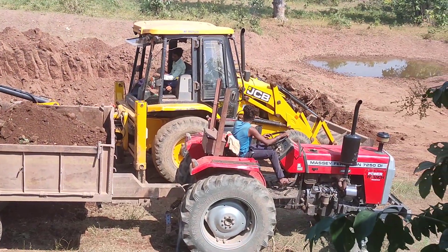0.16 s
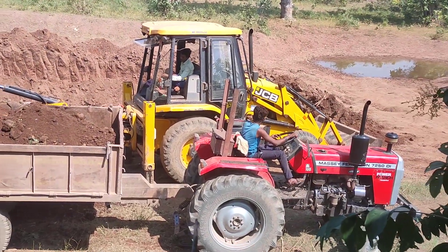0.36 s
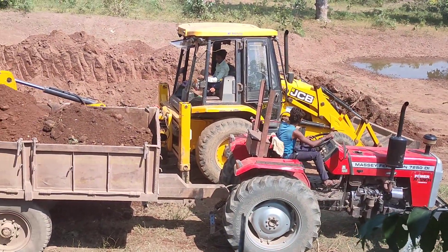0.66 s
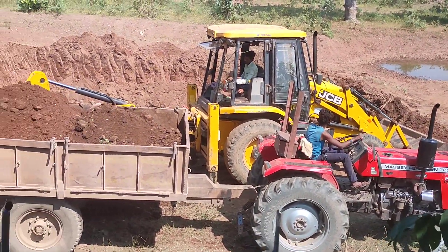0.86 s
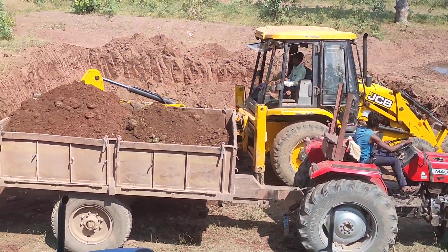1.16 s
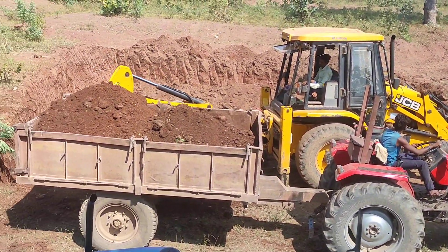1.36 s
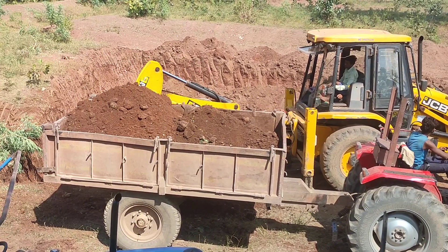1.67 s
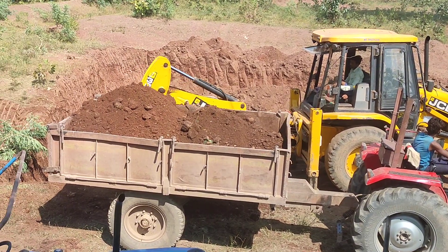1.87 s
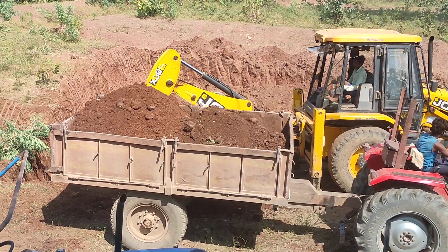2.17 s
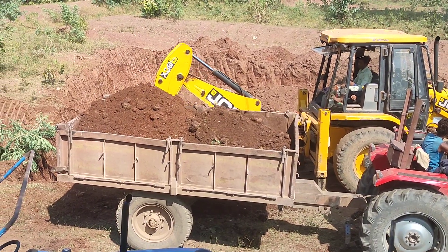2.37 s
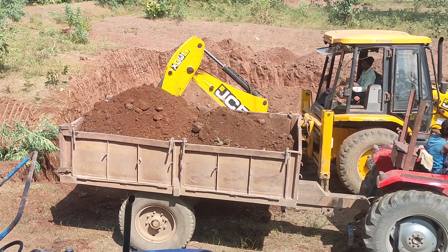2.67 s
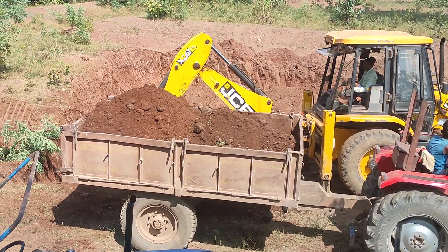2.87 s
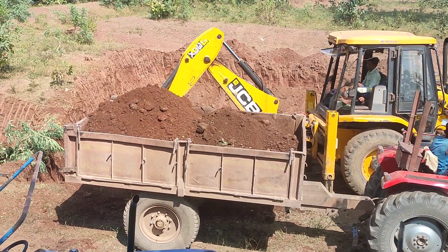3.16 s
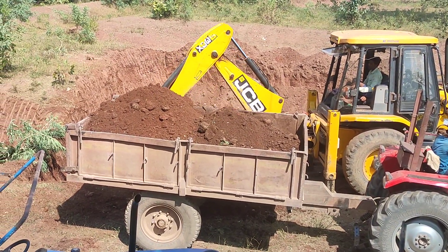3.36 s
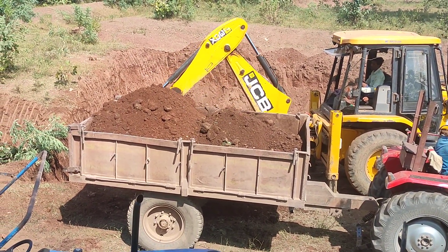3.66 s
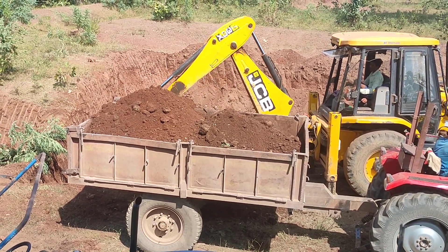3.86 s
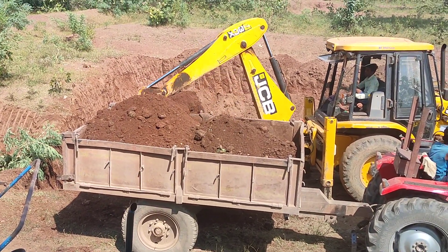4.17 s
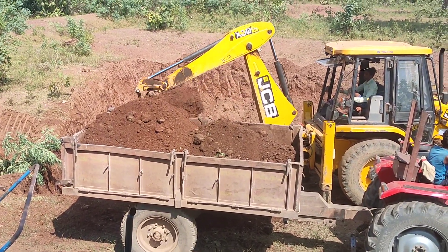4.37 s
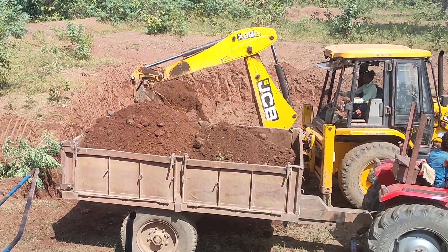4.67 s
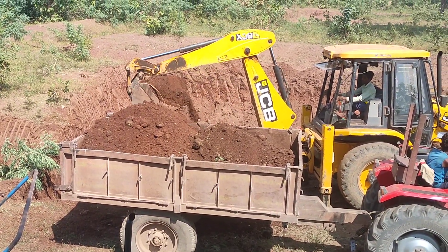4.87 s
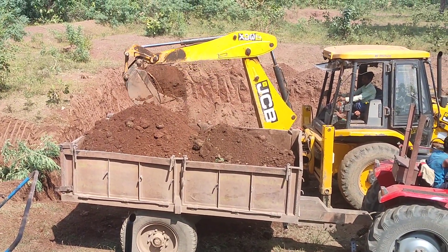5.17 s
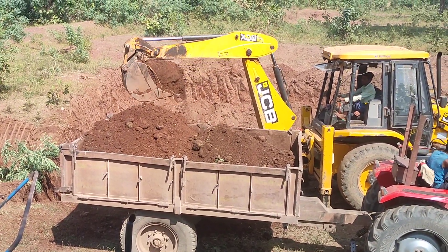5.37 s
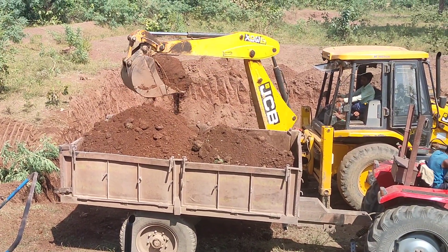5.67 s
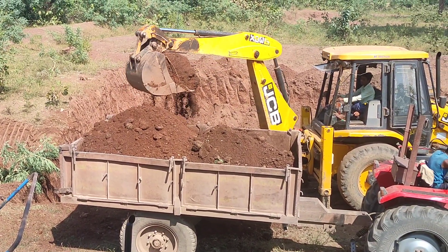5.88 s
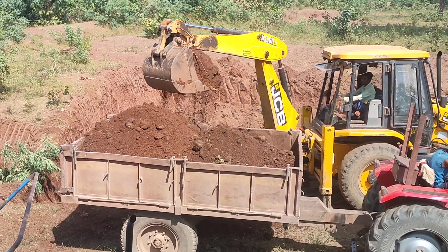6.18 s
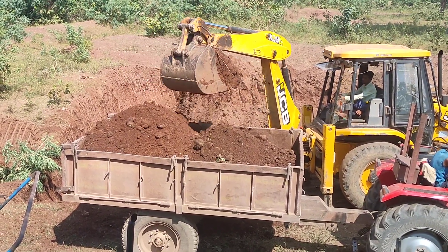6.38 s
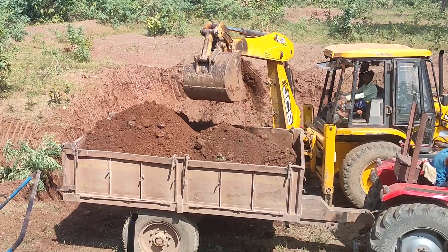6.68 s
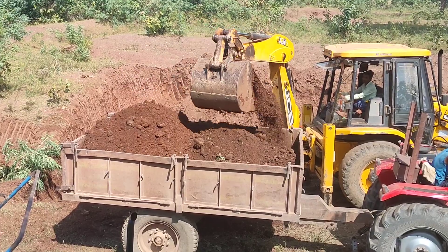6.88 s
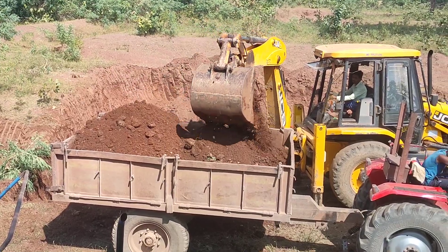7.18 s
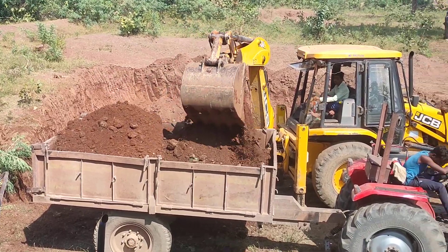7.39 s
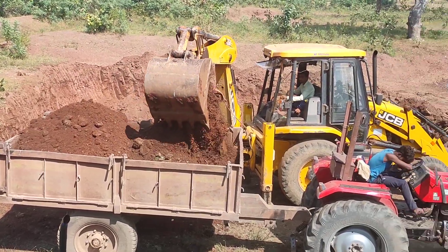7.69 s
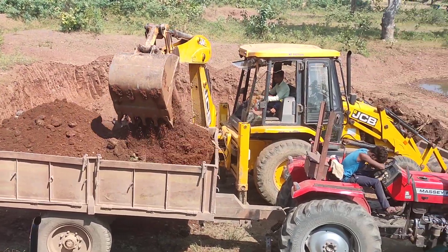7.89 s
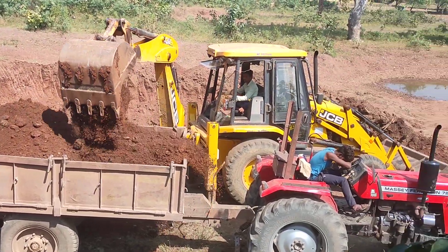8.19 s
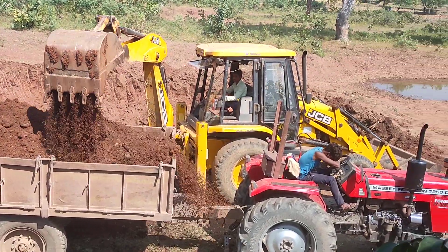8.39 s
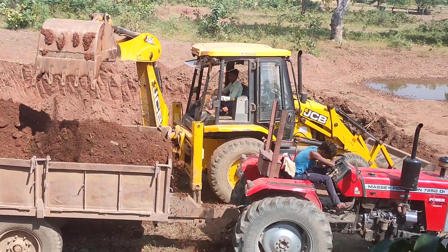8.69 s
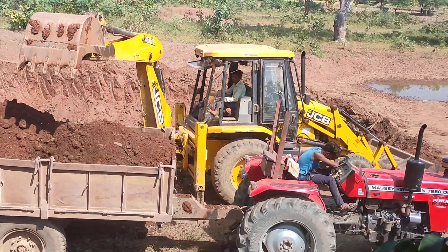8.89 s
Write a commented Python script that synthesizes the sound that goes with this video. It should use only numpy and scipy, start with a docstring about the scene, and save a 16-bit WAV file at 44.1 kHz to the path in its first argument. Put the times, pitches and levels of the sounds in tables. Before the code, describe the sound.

In an open field, a digger's four-cylinder diesel runs fast and uneven a few metres away, over a roaring fan and an idling tractor. A steel bucket scrapes soil in the first second. Later a hydraulic pump whines, soil sizzles from the bucket, and hard linkage clanks strike at about eight seconds, followed by gritty ticks. Close phone pickup, thin in the bass, with wide treble.

```python
"""An open field: a four-cylinder diesel digger works a few metres from a phone, a tractor idling beside it.
Each firing excites resonances: exhaust thud, pipe ring, block knock, valve clatter and injector spit.
Flickering noise bands make the fan roar, the tractor's idle included, with rush and hiss above.
Noise grains sing in the scraping bucket, blows ring its linkage, and a sine at tooth rate is the gear hum.
A narrow resonance whines as the pump; filtered bursts tick as dry grit over a sizzle of pouring soil."""
import sys
import numpy as np
from scipy import signal
from scipy.fft import rfft, irfft
from scipy.io import wavfile
from scipy.ndimage import uniform_filter1d

SR = 44100
rng = np.random.default_rng(int(sys.argv[2]) if len(sys.argv) > 2 else 0)


def transcribe(signal):
    """Save signal, clipped to [-1, 1], as a 16-bit WAV file at the path in sys.argv[1]."""
    frames = np.atleast_2d(signal).T
    limited = np.clip(frames, -1, 1)
    pcm = np.round(limited * 32767).astype(np.int16)
    wavfile.write(sys.argv[1], SR, pcm)


N = 399105
T = np.arange(N) / SR  # time [s]
HZ = np.arange(N // 2 + 1) * SR / N + 1e-3  # spectrum frequencies [Hz], kept above zero


def undb(db):
    """Decibels to amplitude."""
    return 10 ** (np.asarray(db) / 20)


def unit(x):
    """Scale to an RMS of 1."""
    return x / np.sqrt(np.mean(x ** 2))


def noise():
    """Two unrelated noises: the direct sound and what scatters round the phone."""
    return rng.standard_normal((2, N))


def curve(table):
    """Straight lines in time through (time, value) rows."""
    s, values = np.transpose(table)
    return np.interp(T, s, values)


def over_hz(table):
    """Straight lines in log frequency through (frequency, value) rows."""
    hz, values = np.transpose(table)
    return np.interp(np.log(HZ), np.log(hz), values)


def ring(x, modes, sign=-1):
    """Sum of resonances (Hz, width Hz, dB); sign 1 starts them in step, -1 alternately."""
    gain = 0
    for k, (hz, width_hz, db) in enumerate(modes):
        gain = gain + sign ** k * undb(db) / (1 + 1j * (HZ - hz * hz / HZ) / width_hz)
    return irfft(rfft(x) * gain, N)


def soften(x, top_hz):
    """A push that lasts a moment excites little above top_hz: a low-pass."""
    return signal.sosfilt(signal.butter(4, top_hz, fs=SR, output="sos"), x)


def walk(rate):
    """Random levels held 1 / rate s and slewed twice; spread near 1."""
    hold = int(SR / rate)
    steps = np.repeat(rng.standard_normal(N // hold + 1), hold)
    return 1.294 * uniform_filter1d(uniform_filter1d(steps, hold), hold)[:N]


def swell(s, length, db, rise, fall):
    """Rises, holds until s + length, then dies away by 20 dB in fall seconds."""
    fall_db = 20 * np.clip(T - s - length, 0, None) / fall
    return undb(db - fall_db) * np.clip((T - s) / rise, 0, 1)


def decay(s, db, rise, tau):
    """Rises in a straight line from s, then dies away exponentially."""
    fading = np.exp(-np.clip(T - s - rise, 0, None) / tau)
    return undb(db) * fading * np.clip((T - s) / rise, 0, 1)


def bands(spectrum, gate, flicker_db):
    """Half-octave noise bands that each flicker on their own."""
    out, colour, octave = 0, undb(over_hz(spectrum)), np.log2(HZ / 30)
    for centre in np.arange(0, 9.6, .5):
        share = np.cos(np.pi * np.clip(octave - centre, -.5, .5))
        band = irfft(rfft(gate * noise()) * colour * share, N)
        out = out + undb(flicker_db * walk(9)) * band
    return unit(out)


# engine speed: (time [s], crank speed [rpm])
CRANK_SPEED = [(0, 1510.6), (1.15, 1457.4), (2, 1510), (4.2, 1507.6), (4.8, 1524), (6.1, 1504.6),
               (6.7, 1560.2), (7.9, 1522.6), (9.05, 1556.6)]
# load on the engine while the arm lifts and swings: (time [s], load [0-1])
ENGINE_LOAD = [(0, 0.55), (.6, 0.66), (.8, 1), (4.3, 0.82), (4.6, 0.7), (6.2, 0.85), (6.5, 0.22),
               (7.4, 0.36), (7.9, 0.66), (8.4, 0.36), (9.05, 0.44)]
# firings that burn harder than their neighbours: (time [s], extra level [dB])
HARD_FIRINGS = [(.774, 4), (.937, 2), (1.020, 2), (1.267, 3), (1.595, 2), (1.99, 2), (2.070, 2), (2.149, 4),
                (2.230, 2), (2.469, 3), (2.945, 3), (3.024, 3), (3.263, 3), (3.581, 3), (3.819, 2),
                (3.979, 2), (4.06, 3), (4.14, 2), (4.221, 4), (5.325, 2), (5.562, 2), (6.203, 3),
                (6.669, 2), (6.744, 3), (7.29, 2), (8.31, 3), (8.542, 2)]
START_CYCLE = -.186  # place in the two-turn cycle at the start [cycles]
EARLY_STROKES = .02  # advance of a fiercer burn [strokes per unit of burn]
FOURTH_UNLOADED_DB = -8  # the fourth cylinder fades towards this as the load comes off


def firings(lag, cylinder_db, scatter_db, burn, chosen=HARD_FIRINGS):
    """Seconds since the last firing (lag in cycles) and its size; burn is the chance all parts share."""
    rpm = curve(CRANK_SPEED)
    strokes = 4 * (START_CYCLE + np.cumsum(rpm) / 120 / SR - lag + 2)  # + 2 keeps the count positive
    strokes = strokes + EARLY_STROKES * np.interp(strokes, np.arange(len(burn)), burn)
    count = strokes.astype(int)
    stroke_db = scatter_db * (burn + rng.standard_normal(len(burn))) / np.sqrt(2)
    s, extra_db = np.transpose(chosen)
    stroke_db[np.round(np.interp(s, T, strokes)).astype(int)] = extra_db  # in place of the scatter
    unloaded = np.clip(1 - 2 * curve(ENGINE_LOAD), 0, 1)
    db = np.take(cylinder_db, count % 4) + (count % 4 == 3) * FOURTH_UNLOADED_DB * unloaded
    return (strokes - count) * 30 / rpm, undb(db + stroke_db[count])


def puffs(firing, decay_s, steady):
    """Gas flow that jumps at each firing and dies away onto a steady level."""
    since, size = firing
    return steady + size * np.exp(-since / decay_s)


def blows(firing, tail, steady):
    """One sharp pressure step per firing with a ragged tail; the scattered copy trails by 9 samples."""
    since, size = firing
    step = size * (np.diff(since, prepend=0) < -1 / SR / 2)
    rattle = (steady + tail * size * np.exp(-since / .008)) * noise()
    return np.array([step, np.roll(step, 9)]) + rattle


# soil pouring from the bucket: (time [s], length [s], level before its filter [dB])
SOIL_POURS = [(6.3, 1, -65), (8.0, 0.95, -56)]
# ticks of dry grit: (time [s], peak before the filters [dB], decay [s], lowest frequency [Hz])
GRIT_TICKS = [(3.735, -37, 0.098, 12500), (6.802, -35, .01, 13000), (6.938, -31.5, 0.0097, 6100),
              (8.33, -34, 0.01, 8000), (8.391, -35, 0.017, 5500), (8.745, -34.5, 0.017, 6040),
              (8.785, -32, 0.02, 5400), (8.829, -28, 0.02, 5070)]
POUR_RISE_S, POUR_FALL_S, GRIT_RISE_S = 0.061, 0.23, 0.014


def grit():
    """Short fizzes of tiny clicks above their lowest frequency, over a sizzle of pouring soil."""
    flow = sum(swell(*row, POUR_RISE_S, POUR_FALL_S) for row in SOIL_POURS)
    out = flow * undb(2.1 * walk(110)) * ring(noise(), [(10800, 44000, 1.8)])
    for s, db, tau, low_hz in GRIT_TICKS:
        clicks = decay(s - GRIT_RISE_S / 2, db, GRIT_RISE_S, tau) * undb(1.7 * walk(300)) * noise()
        clicks = ring(clicks, [(6340, 2900, -3.5), (15100, 2400, -3), (11000, 7300, -18)], 0.62)
        out = out + signal.sosfilt(signal.butter(4, low_hz, "high", fs=SR, output="sos"), clicks)
    return out


# hydraulic pump strokes: (time [s], length [s], level [dB])
PUMP_STROKES = [(6.152, 0.84, -53.5), (7.002, 0.76, -49), (8.306, 0.22, -54)]
PUMP_HZ, PUMP_WIDTH_HZ = 1496, 26
PUMP_RISE_S, PUMP_FALL_S = 0.16, 0.19


def pump():
    """A wavering whine: oil flow in one narrow resonance."""
    flow = sum(swell(*row, PUMP_RISE_S, PUMP_FALL_S) for row in PUMP_STROKES)
    return flow * unit(ring(noise(), [(PUMP_HZ, PUMP_WIDTH_HZ, 0)]))


# strength of the four cylinders in the block knock, which also jolts the gear: (level [dB]) each
KNOCK_CYLINDERS = [-9, 0, -14, -6]
GEAR_TEETH, RATED_RPM = 24, 1510
# before the jolts: level unloaded, gain at full load, gain as the speed sags
GEAR_DB, GEAR_LOAD_DB, GEAR_LABOUR_DB_PER_RPM = -48.5, 9, 0.12


def gear():
    """A gear on the crank hums once a tooth, louder under load, jolted by each firing, and wavers."""
    rpm = curve(CRANK_SPEED)
    turns = np.cumsum(rpm * (1 + .012 * walk(25))) / 60 / SR
    level_db = GEAR_DB + GEAR_LOAD_DB * curve(ENGINE_LOAD) + GEAR_LABOUR_DB_PER_RPM * (RATED_RPM - rpm)
    level_db = level_db + 3.0 * walk(40)
    jolts = puffs(firings(.19, KNOCK_CYLINDERS, 1.2, rng.standard_normal(N // 500)), .03, .3)
    hum = undb(level_db) * jolts * np.sin(2 * np.pi * GEAR_TEETH * turns)
    return hum * np.array([[np.sqrt(2)], [0]])  # direct sound only


# bucket dragging through soil: (time [s], length [s], steel singing level [dB], stony rasp level [dB])
SCRAPES = [(0.142, 0.04, -34, -52.5), (0.194, 0.39, -42.5, -52.5), (0.315, 0.052, -37, -51),
           (0.653, 0.39, -48, -49)]
# partials of the bucket steel: (frequency [Hz], relative level [dB])
BUCKET_PARTIALS = [(716, 5), (785, 9), (890, 5), (1590, -2), (1760, -10), (1900, 1), (1965, 0), (2150, -7),
                   (2360, -3), (2480, -4), (2580, 0), (2760, -2), (3260, -7), (3540, -10), (3850, -9),
                   (4020, -7), (4420, -9)]
SCRAPE_RISE_S, SCRAPE_FALL_S = 0.019, 0.15


def bucket():
    """Stones slip along the steel in dense uneven grains that rasp and keep its partials singing."""
    singing, rasping = (sum(swell(s, length, dbs[k], SCRAPE_RISE_S, SCRAPE_FALL_S)
                            for s, length, *dbs in SCRAPES) for k in range(2))
    grains = undb(2.0 * walk(62.0)) * noise()
    rasp = ring(ring(grains, [(2720, 1100, -0.5), (7260, 760, -1)]), [(3500, 3100, 0)])
    partials = [(hz, 30, db / 2) for hz, db in BUCKET_PARTIALS]  # half the level, passed twice
    song = ring(ring(grains, partials), partials)
    return singing * unit(song) + rasping * unit(soften(rasp, 11000))


# linkage clanks, levels before the resonances:
# (time [s], peak [dB], rise [s], decay [s], boom over peak [dB], hardness over peak [dB])
LINKAGE_CLANKS = [(1.654, -41.5, 0.014, 0.032, 6.5, -36), (5.125, -45.5, 0.014, 0.04, 11, -57),
                  (8.037, -28.5, 0.008, 0.016, 8, -6), (8.06, -33.5, 0.0042, 0.025, -5, -5),
                  (8.147, -38.5, 0.0044, 0.033, 1, -34), (8.574, -43, 0.021, 0.022, 2, -24),
                  (8.827, -43, 0.0026, 0.013, 7, -30)]
# modes of the steel arm: (frequency [Hz], relative level [dB], 60 dB decay time [s])
ARM_MODES = [(479, -12, .06), (641, -12, .06), (991, -17, .06), (1249, -20, .07), (1384, -26, .07),
             (1879, -24, .055), (2064, -25, .04), (2288, -30, .07), (2482, -26, .045), (2762, -30, .035),
             (2912, -30, .08), (3472, -33, .05), (3720, -30, .045), (3924, -35, .06)]
STRIKE_DB = 28  # the clean blow at the top of each clank, over its rough part


def clanks():
    """A blow rings the steel arm, booms in the trailer body and cracks; hard ones add treble and a thump."""
    def rough(k):
        envelope = sum(decay(s, db + [0, boom_db, hard_db][k], rise, tau)
                       for s, db, rise, tau, boom_db, hard_db in LINKAGE_CLANKS)
        return envelope * undb(1.0 * walk(250)) * noise()

    hits, booms, snaps = rough(0), rough(1), rough(2)
    s, db, rise, _, boom_db, _ = np.transpose(LINKAGE_CLANKS)
    strikes = np.zeros((2, N))  # for the high and the low modes
    strikes[:, ((s + rise) * SR).astype(int)] = undb([db + STRIKE_DB, db + boom_db + STRIKE_DB])
    modes = [(hz, np.log(1000) / np.pi / t60, db) for hz, db, t60 in ARM_MODES]
    high, low = [m for m in modes if m[0] > 1450], [m for m in modes if m[0] <= 1450]
    crack = soften(ring(hits, [(2430, 2400, 10.0)]), 4100)
    treble = soften(ring(snaps, [(6700, 1200, 3.9)]), 9200)
    boom = ring(ring(booms, [(580, 800, 20.7)]), [(640, 650, 0)])
    thump = soften(ring(snaps, [(165, 100, 37.0)]), 180)
    arm = undb(41) * soften(ring(hits + strikes[0], high), 4500)
    arm = arm + undb(32.5) * ring(booms + strikes[1], low)
    return crack + treble + boom + thump + arm


# strength of the four cylinders in the clatter and the gas flow: (level [dB]) each
CLATTER_CYLINDERS = [-2, 0, -5, -4]
# fan, gears and the idling tractor: (frequency [Hz], relative level [dB])
ROAR_SPECTRUM = [(250, -13), (330, 1.5), (460, 2.5), (740, -4.5), (1000, -6), (1350, -12.5), (1700, -19),
                 (2400, -43)]


def fan_roar(burn):
    """Low noise bands that swell with each exhaust puff."""
    return bands(ROAR_SPECTRUM, puffs(firings(.21, CLATTER_CYLINDERS, .8, burn), .014, .85), 0.87)


# middle and top of the gas noise, each: (frequency [Hz], relative level [dB])
RUSH_SPECTRUM = [(500, -33), (1200, -44), (1600, -0.5), (3000, 1.5), (4200, -8.5), (4950, -21), (6000, -55)]
HISS_SPECTRUM = [(4000, -5), (4950, -9.5), (6900, -3.5), (8500, -11), (10700, -22.5), (13000, -23),
                 (15800, -9.5)]


def gas_noise(burn):
    """Rush and hiss bands, both pushed by the same gas puffs but dying away at different rates."""
    gas = firings(.21, CLATTER_CYLINDERS, 1.0, burn)
    rush = bands(RUSH_SPECTRUM, puffs(gas, 0.029, 2.0), 0.5)
    hiss = bands(HISS_SPECTRUM, puffs(gas, 0.092, 1.5), 1.0)
    return rush, hiss


# strength of the four cylinders at the injectors: (level [dB]) each
SPIT_CYLINDERS = [0, 0, -1, -3]
# injector resonances: (frequency [Hz], width [Hz], relative level [dB])
INJECTOR_MODES = [(11830, 60, 0), (12300, 50, -4), (14800, 100, -1), (14500, 3000, -8)]


def injector_spit(burn):
    """Each injection is a noise puff through high resonances."""
    return unit(ring(puffs(firings(.16, SPIT_CYLINDERS, 1.4, burn), .007, .2) * noise(), INJECTOR_MODES))


# resonances of the valve covers: (frequency [Hz], width [Hz], relative level [dB])
COVER_MODES = [(1488, 15, 8), (1994, 110, -1.5), (2235, 46, 8.5), (3550, 65, -20)]


def valve_clatter(burn):
    """Rough blows rattle the covers."""
    blow = blows(firings(0.17, CLATTER_CYLINDERS, 1.28, burn), 0.053, 0.094)
    return unit(soften(ring(blow, COVER_MODES), 3100))


# strength of the four cylinders in the tappet tick: (level [dB]) each
TICK_CYLINDERS = [-7, 0, -14, -12]
# tappet ticks that stand out: (time [s], extra level [dB])
LOUD_TICKS = [(.055, 3), (.132, 6), (.451, 0), (.531, 6), (.61, 0), (.772, 8), (.937, 3.5), (1.02, 7),
              (2.148, 11), (2.31, 14), (2.945, 7), (4.28, 14), (4.46, 6), (7.837, 8)]
# tappet resonances: (frequency [Hz], width [Hz], relative level [dB])
TAPPET_MODES = [(2900, 36, 0), (3070, 45, -1)]


def tappet_tick(burn):
    """Blows ring two close tappet resonances inside a broad one."""
    blow = blows(firings(.19, TICK_CYLINDERS, 1.6, burn, LOUD_TICKS), .03, .002)
    return unit(ring(ring(blow, TAPPET_MODES), [(3000, 500, 0)]))


# resonances of the engine block: (frequency [Hz], width [Hz], relative level [dB])
BLOCK_MODES = [(1063.3, 35, 11), (1240.6, 12.7, 6.2)]


def block_knock(burn):
    """Combustion blows ring the block inside a broad resonance."""
    blow = blows(firings(.185, KNOCK_CYLINDERS, .8, burn), .02, .003)
    return unit(ring(ring(blow, BLOCK_MODES, 1), [(1130, 650, 0)]))


# strength of the four cylinders in the pipe ring: (level [dB]) each
RING_CYLINDERS = [-4, 0, -1, -5]
# pipe resonances: (frequency [Hz], width [Hz], relative level [dB])
PIPE_MODES = [(549, 18, -2.5), (584, 20.3, 7), (813, 16.7, -0.5)]


def pipe_ring(burn):
    """Pressure steps ring the pipe inside a broad resonance."""
    blow = blows(firings(.175, RING_CYLINDERS, 1.0, burn), .022, .008)
    return unit(ring(ring(blow, PIPE_MODES, 1), [(680, 700, 0)]))


# strength of the four cylinders in the exhaust thud: (level [dB]) each
THUD_CYLINDERS = [-9, 0, -13, -2]
# exhaust resonances: (frequency [Hz], width [Hz], relative level [dB])
EXHAUST_MODES = [(277.7, 14, 5.5), (371.3, 34, 7), (393.4, 27, 10), (515.7, 37, 12.5), (764, 98, -7.5)]


def exhaust_thud(burn):
    """Pressure steps ring the low exhaust resonances in step."""
    blow = blows(firings(.195, THUD_CYLINDERS, 1.0, burn), .03, .007)
    return unit(soften(ring(blow, EXHAUST_MODES, 1), 850))


# how far the phone is turned towards the engines: (time [s], facing [0-1])
PHONE_FACING = [(0, 0.48), (.3, 1), (1.0, 0.71), (1.5, 0.09), (2.5, 0.08), (7.3, 0.2), (8.1, 0.47),
                (9.05, 0.48)]
# thud, pipe ring, knock, roar, clatter, tick, treble:
# (reference level [dB], gain at full load [dB], gain when faced [dB])
ENGINE_PARTS = [(-37.5, -3, 4), (-41, 3.5, -3.5), (-51.5, 11, 1), (-38, 2.5, 4), (-48.5, 0.5, 7),
                (-58.5, 5, 12.5), (-59, -1.74, 2)]


def engine():
    """Each firing rings every part over air and gear roar; load and the phone's facing set the balance."""
    load, facing = curve(ENGINE_LOAD), curve(PHONE_FACING)
    thud, pipe, knock, roar, clatter, tick, treble = (
        undb(db + load * load_db + facing * faced_db) for db, load_db, faced_db in ENGINE_PARTS)
    burn = rng.standard_normal(N // 500)
    rush, hiss = gas_noise(burn)
    return (roar * fan_roar(burn)
            + clatter * (rush + 0.48 * valve_clatter(burn))
            + treble * (2.83 * hiss + .45 * injector_spit(burn))
            + tick * tappet_tick(burn)
            + knock * block_knock(burn)
            + pipe * pipe_ring(burn)
            + thud * exhaust_thud(burn))


# how alike the two ports hear, limited to 0.99 in use: (frequency [Hz], left-right correlation)
PORT_LIKENESS = [(60, 1), (290, 0.93), (640, 1), (1400, 0.33), (2500, 0.26), (4000, 0.11), (8000, 0.04),
                 (15000, 0.06)]
# left port over right: (frequency [Hz], level difference [dB])
PORT_BALANCE = [(60, -1.5), (110, 3), (200, 1.5), (380, -1), (700, 1.5), (1290, -2), (2380, 2.5),
                (4400, 5.5), (8120, 3.5), (15000, 6)]
LEFT_LEAD_S = .00009


def scene():
    """Sum the sources at two ports: alike in the bass, nearly unrelated in the treble, the left early."""
    direct, scattered = rfft(grit() + pump() + gear() + bucket() + clanks() + engine())
    alike = np.clip(over_hz(PORT_LIKENESS), -.9, .99)
    side = np.array([[1], [-1]])
    ports = np.sqrt((1 + alike) / 2) * direct + side * np.sqrt((1 - alike) / 2) * scattered
    lead = np.exp(1j * np.pi * side * HZ * LEFT_LEAD_S)  # half the lead on each side
    return irfft(ports * lead * undb(side * over_hz(PORT_BALANCE) / 2), N)


LOW_CUT_HZ, LEAK_DB, TOP_HZ = 284.3, -40.5, 15760


def record(dry):
    """The phone cuts wind-range bass steeply, leaving a faint trace of it, and cuts the top."""
    cut = signal.sosfilt(signal.butter(9, LOW_CUT_HZ, "high", fs=SR, output="sos"), dry)
    cut = cut + undb(LEAK_DB) * dry
    return signal.sosfilt(signal.ellip(12, .2, 80, TOP_HZ, fs=SR, output="sos"), cut)


dry = scene()
out = record(dry)
transcribe(out)
```